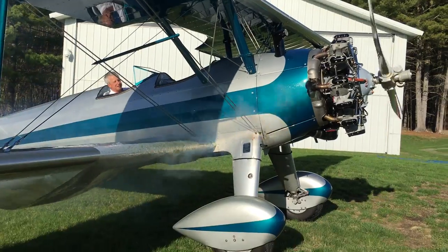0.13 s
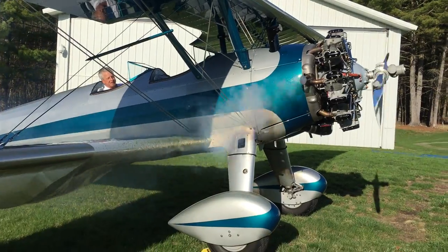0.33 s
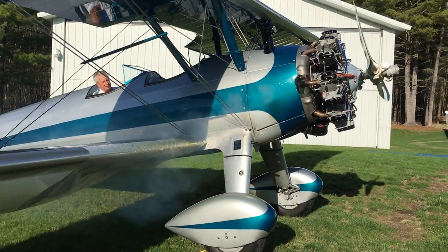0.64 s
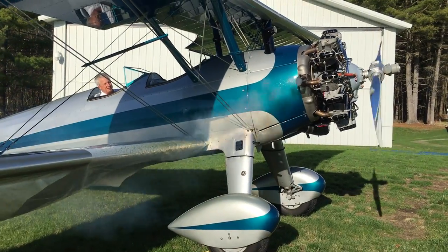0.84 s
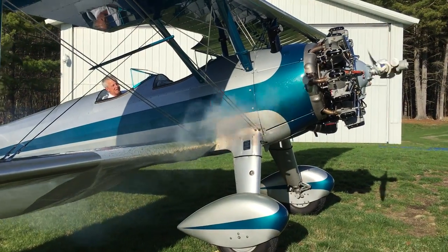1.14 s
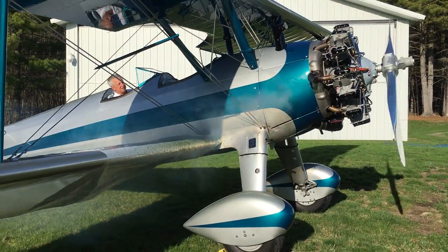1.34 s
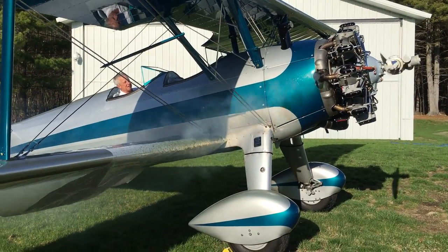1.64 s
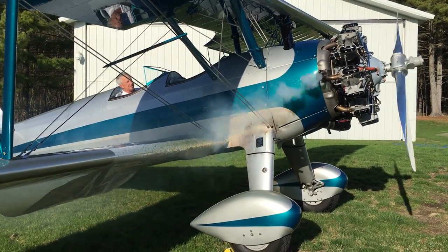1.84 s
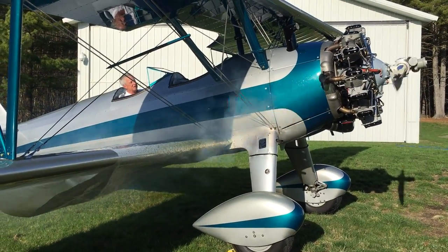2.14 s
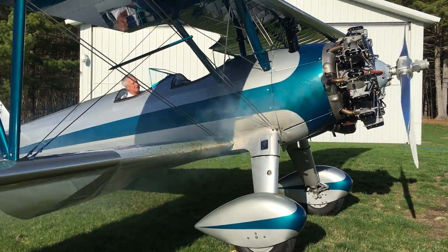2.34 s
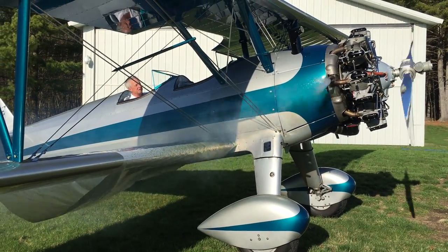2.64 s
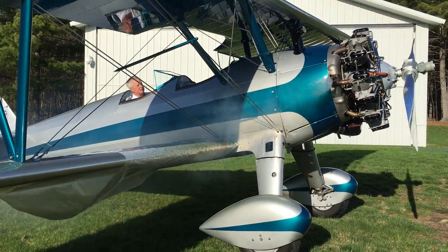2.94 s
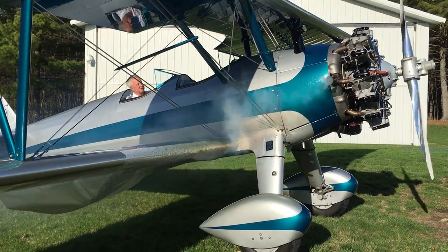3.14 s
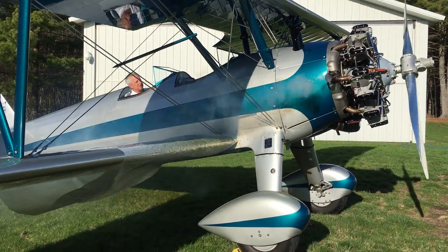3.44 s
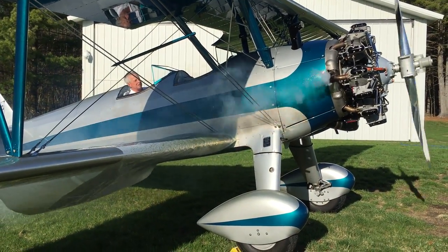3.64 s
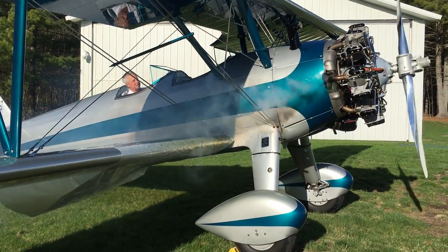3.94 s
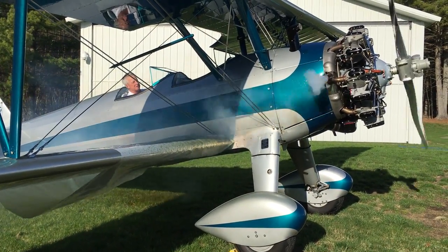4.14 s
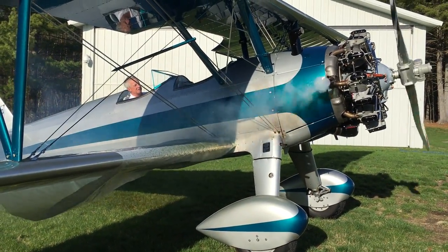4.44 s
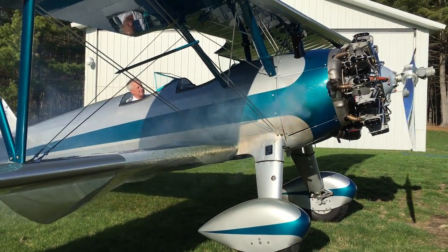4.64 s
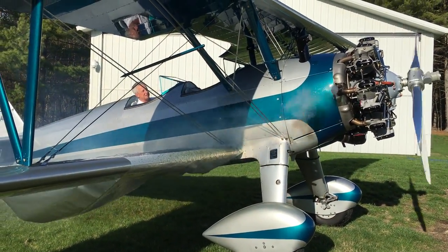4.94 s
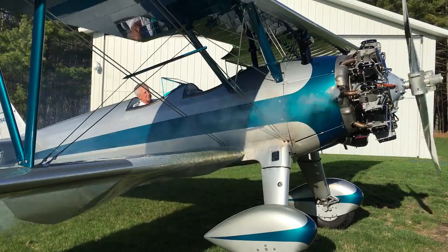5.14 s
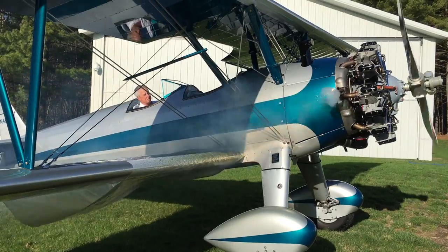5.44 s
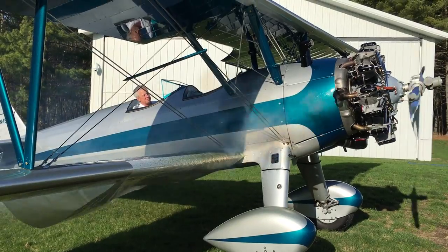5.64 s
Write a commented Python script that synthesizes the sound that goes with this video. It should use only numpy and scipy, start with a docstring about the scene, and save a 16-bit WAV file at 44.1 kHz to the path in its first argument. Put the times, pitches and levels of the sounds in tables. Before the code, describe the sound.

A freshly started seven-cylinder radial engine runs throughout at a rough slow idle. Separate exhaust strokes pop, hiss and bark in a fast lurching rhythm, some cracking hard, others missing and leaving gaps over a low throb. Gear churn, propeller wash and loose metal ticks continue beneath. Close outdoor microphone, mostly dry, with brief faint echoes from the wings, hangar and trees.

```python
"""A seven-cylinder radial aircraft engine, just started, lopes at about 490 rpm on the grass before a hangar.
Gears, propeller wash and loose metal churn and tick from the start. As each exhaust valve opens, a sharp jet
of gas rings the pipe, with a boom and a bark; hard firings crack, and rumble and a rising hum trail the stroke.
The cold cylinders often miss, and each miss slows the crank. Firing or not, each stroke pumps a deep throb.
Last come the echoes of the exhaust from the wings, the hangar and the trees."""
import sys
import numpy as np
from scipy import signal
from scipy.fft import rfft, irfft
from scipy.io import wavfile
from scipy.ndimage import uniform_filter1d

SR = 44100
rng = np.random.default_rng(int(sys.argv[2]) if len(sys.argv) > 2 else 0)


def transcribe(signal):
    """Save signal, clipped to [-1, 1], as a 16-bit WAV file at the path in sys.argv[1]."""
    frames = np.atleast_2d(signal).T
    limited = np.clip(frames, -1, 1)
    pcm = np.round(limited * 32767).astype(np.int16)
    wavfile.write(sys.argv[1], SR, pcm)


N = 254898

# Gears, valve gear and propeller wash. Each row: frequency in Hz, relative density in dB per Hz.
MACHINE_SPECTRUM = [(15, -13), (60, -11), (120, -16), (165, -12), (210, 14), (300, 12), (460, -1.5),
                    (620, -1), (1000, 0.5), (1900, 0.5), (2800, -4.5), (3900, -5), (7000, -17.5),
                    (16000, -23)]
# Crankshaft speed while all cylinders fire. Each row: time in seconds, speed in rpm.
CRANK_SPEED = [(0, 496.61), (2.608, 489.78), (2.656, 508.66), (4.083, 486.64), (4.645, 519.66),
               (5.78, 516.63)]
# A usual firing of each cylinder, in firing order. Each row: how early the valve opens in seconds,
# gas jet in dB, pipe ring in dB, boom in dB, boom pitch in Hz, length of the jet in seconds.
USUAL_FIRINGS = [(.0082, -24.5, -22, -60, 293, 0.02), (.0071, -29, -24.5, -34, 294, 0.02),
                 (.012, -19, -21, -26, 304, 0.016), (.0098, -18.5, -17.5, -34.5, 288, 0.012),
                 (.0091, -30, -25, -42.5, 259, .02), (.0092, -22.5, -22, -29, 288.4, 0.02),
                 (.0106, -19, -21.3, -27, 328.7, 0.016)]
# Bangs and half-burnt charges, against the cylinder's usual firing. Each row: time in seconds,
# change of gas jet, pipe ring and boom in dB, then the length of the jet itself in seconds.
ODD_FIRINGS = [(.02, 4, 1, 0, 0.021), (.2, 1.5, 0.5, -0.5, .018), (.27, -3, -1.5, -8, .022),
               (.41, -.5, 0.5, -10, .017), (.48, 3, -0.5, -2, 0.018), (.52, -8, -4, 1, 0.016),
               (.55, 1.5, 2, 1.5, 0.02), (.62, 2, -0.5, 12, 0.02), (.77, .5, 2, 2, 0.019),
               (.91, 3, 3, -12, 0.018), (.98, 5.5, 3, -4, 0.018), (1.12, 3, 1, -9, 0.017),
               (1.26, -2.5, -2.5, 0, 0.023), (1.4, 2.5, 4.5, -3, 0.018), (1.44, -.5, -2, -12, .015),
               (1.54, -1.5, -4.5, -4, 0.017), (1.83, -1.3, -0.5, 11.5, 0.012), (1.9, -2, -4, -21, .016),
               (2.01, 4, 1.5, 5.5, 0.02), (2.29, -2.5, 1, 5, 0.02), (2.33, -10, -6.5, 2, 0.01),
               (2.36, -.5, 1.5, 9, 0.024), (2.58, -12, -11.5, -19, 0.014), (2.75, -1, -2, 7, .026),
               (2.78, 0.3, 2, 1.5, 0.015), (2.92, -20, -12, -12, .013), (2.96, 2.5, 1.5, -3, .012),
               (3.06, 2.3, 1.5, 2, 0.011), (3.13, -0.5, -2, 0, 0.012), (3.24, 0, 2, -14, .015),
               (3.41, 1.5, 0, -6, 0.017), (3.59, -3, 0.5, 7, 0.022), (3.66, 2, 2.5, 1, .016),
               (3.73, 5, 1.5, -4, 0.016), (3.8, -1.5, 1.5, -2, 0.0098), (3.91, 1, -2.5, -1, 0.015),
               (3.98, -5, -14, 0, 0.0098), (4.08, -3, 0.5, 2, 0.015), (4.57, 2, -1.5, 5, 0.015),
               (4.6, -1, 0.5, -10, 0.019), (4.73, 2, -7.5, -0.5, 0.014), (4.8, -3, -2.5, -5, 0.019),
               (4.83, 1.5, -4, 0.5, .021), (4.86, -2, -3, -9, .015), (5.17, 4.5, 1.5, -7, 0.019),
               (5.41, -4, 0, 5, .0175), (5.43, -4, -2.5, -24, 0.017), (5.54, -4.5, -7, -20, .012),
               (5.57, -7.5, -3.5, -26, .012)]
# Strokes that fail to fire: a faint puff of gas and a boom, sometimes strong.
# Each row: time in seconds, boom in dB.
MISFIRES = [(.09, -50), (.3, -32), (.44, -50), (.59, -31), (.8, -31.5), (.83, -40), (.94, -53), (1.29, -38),
            (1.33, -50), (1.509, -39), (1.58, -31), (1.929, -50), (2.039, -29), (2.08, -50), (2.22, -48),
            (2.44, -43), (2.54, -38), (2.82, -37), (3.02, -43), (3.3, -49), (3.51, -30), (3.552, -57),
            (4.05, -48), (4.291, -57), (4.76, -41), (4.96, -45), (5, -44), (5.132, -48), (5.47, -29),
            (5.71, -48)]
# Exhaust character, in firing order. Each row: boom delay in seconds, bark in dB, pipe note favoured in Hz,
# boost of that note in dB, jet brightness in dB per octave.
CYLINDERS = [(-0.034, -2.5, 1490, 2.5, 0), (0.0097, -11, 1050, 1.5, 3.5), (0, -10.5, 2000, 9.5, 2),
             (.006, -13.5, 1500, 8.5, 6.5), (-0.012, -13, 1490, 2, 6), (0.001, -11, 2150, 3.5, 3.5),
             (-.003, -12, 1830, 7.5, 10)]
# Gas jet at the outlet. Each row: frequency in Hz, relative density in dB per Hz.
JET_SPECTRUM = [(300, -7.5), (900, -21.5), (2000, -1.5), (2900, -18.5), (3700, 1.5), (5000, -0.5),
                (6500, 2.5), (8000, 0.5), (9700, -0.5), (10400, -7), (11300, -3.5), (13000, -7.5),
                (16000, -13)]
# Higher notes of the exhaust pipe. Each row: pitch in Hz, width in Hz, level in dB.
PIPE_NOTES = [(711, 27, 0), (895, 42, 3), (986, 72, 3.5), (1169, 85, -1.5), (1280, 64, -2), (1497, 52, 9.5),
              (1843, 155, 3), (2150, 85, 6), (2400, 90, 1), (2777, 54, -4.5), (3330, 374, 0.5),
              (3735, 318, 4.5), (4204, 140, -1), (5340, 440, -2), (6620, 290, 0.5)]
# Each cylinder joins the collector ring at its own place and drives its two lowest air modes differently.
# Each row: deep mode in dB, its delay in seconds, upper mode in dB, its delay in seconds.
COLLECTOR_DRIVE = [(-18, -0.0103, -19, 0.0026), (-25.5, 0.0013, -35, -0.0146),
                   (-21.5, 0.0126, -22.5, -.0136), (-14.5, -0.0027, -22, 0.0108),
                   (-16, -0.0065, -30, 0.0104), (-31, 0.0027, -19.5, 0.01785), (-28, 0.0246, -20, 0.0057)]
# Eddies that follow each slug of gas out of the pipe. Each row: frequency in Hz, relative density in dB per Hz.
EDDY_SPECTRUM = [(15, -30), (26, -14), (33, 1), (50, -2.5), (70, -6), (95, 3), (115, 1), (140, -9),
                 (165, -23.5), (195, -7), (240, -19), (330, -16.5), (450, -35), (2000, -76)]
# How long the echoes last. Each row: frequency in Hz, time to fall by 60 dB in seconds.
YARD_DECAY = [(100, 0.21), (1000, 0.32), (4000, 0.13), (16000, 0.078)]

SAG_RPM, RECOVER_S = 11.68, .1392  # speed lost at a misfire; time constant of winning it back
PUFF_JET_DB, PUFF_RING_DB = -55, -41.5  # the faint gas jet and pipe ring of a misfire
OUTLET_ECHO_S, OUTLET_ECHO = .00164, .3  # the jet's reflection in the stub of the pipe: delay, gain
BARK_HZ, BARK_WIDTH_HZ = 597.4, 43.5  # the tail pipe's lowest strong note
BOOM_WIDTH_HZ = 44.4  # the collector's hollow boom at each stroke
DEEP_HZ, DEEP_WIDTH_HZ = 48.4, 22.7
UPPER_HZ, UPPER_WIDTH_HZ = 91.4, 36.2
USUAL_JET_DB = -22  # the jet level against which harder and softer strokes are weighed
EDGE_HZ = 16020


def gain_of(db):
    """Decibels to amplitude."""
    return 10 ** (np.asarray(db) / 20)


def evened(x):
    """Scales to an rms of 1."""
    return x / np.sqrt(np.mean(x ** 2) + 1e-20)


def read_curve(points, hz):
    """Reads a table of (Hz, value) on a log-frequency axis."""
    f, value = np.transpose(points)
    return np.interp(np.log(hz + 1), np.log(f + 1), value)


def add(mix, s, sound):
    """Mixes a sound in at a time in seconds."""
    part = mix[max(round(s * SR), 0):][:len(sound)]
    part += sound[:len(part)]


def delayed(x, s):
    """The same sound, later."""
    return np.interp(np.arange(N) - round(s * SR), np.arange(N), x, left=0)


def filtered(x, order, hz, kind):
    """A Butterworth filter, run forward."""
    return signal.sosfilt(signal.butter(order, hz, kind, fs=SR, output="sos"), x)


def noise(spectrum, size, tilt_db=0):
    """Noise of rms 1 with a given spectrum, tilted by some dB an octave."""
    hz = np.fft.rfftfreq(size, 1 / SR)
    colour = gain_of(read_curve(spectrum, hz) + tilt_db * np.log2(hz + 1))
    return evened(irfft(rfft(rng.standard_normal(size)) * colour, size))


def resonate(x, hz, width_hz):
    """A resonance with a gain of 1 at its centre."""
    return signal.lfilter(*signal.iirpeak(hz, hz / width_hz, fs=SR), x)


def ring(x, modes):
    """Passes a sound through a set of resonances side by side."""
    return sum(gain_of(db) * resonate(x, hz, width_hz) for hz, width_hz, db in modes)


def note(hz, width_hz, glide=0):
    """An air resonance that swells and dies; hot gas may bend its pitch as it sounds."""
    t = np.arange(8192) / SR
    age = np.pi * width_hz * t
    turns = np.cumsum(hz * (1 + glide * np.tanh(age - 2))) / SR
    return age * np.exp(1 - age) * np.sin(2 * np.pi * turns)


def blowdown(t, length_s, rise_s, fall_s):
    """Gas flow: it swells as the valve lifts, holds while the port is choked, then dies as the cylinder empties."""
    swell = 1 - np.exp(-t / rise_s)
    return swell / np.sqrt(1 + np.exp(2 * (t - length_s) / fall_s))


def valve_times():
    """One exhaust valve after another opens, all in two turns of the crank; each misfire costs the crank speed."""
    step_s, count = .001, len(USUAL_FIRINGS)
    t = np.arange(0, N / SR + .1, step_s)
    rpm = np.interp(t, *np.transpose(CRANK_SPEED))
    for s, _ in MISFIRES:
        rpm -= SAG_RPM * (t > s) * np.exp(-abs(t - s) / RECOVER_S)
    opened = np.cumsum(rpm / 60) * step_s * count / 2  # running count of strokes
    times = np.array([np.interp(k, opened, t) - USUAL_FIRINGS[k % count][0] for k in range(int(opened[-1]))])
    return times[times < N / SR]


def firings():
    """Every exhaust stroke as (s, gas jet dB, pipe ring dB, boom dB, boom pitch Hz, length of the jet s)."""
    times = valve_times()
    rows = np.array([(s, *USUAL_FIRINGS[k % len(USUAL_FIRINGS)][1:]) for k, s in enumerate(times)])
    for s, jet_db, ring_db, boom_db, length_s in ODD_FIRINGS:
        row = rows[abs(times - s).argmin()]  # the stroke nearest in time
        row[1:4] += jet_db, ring_db, boom_db
        row[-1] = length_s
    for s, boom_db in MISFIRES:
        rows[abs(times - s).argmin(), 1:4] = PUFF_JET_DB, PUFF_RING_DB, boom_db
    return rows


def strokes(cylinders):
    """Pairs each exhaust stroke with its cylinder's row of a table."""
    return [(row, cylinders[k % len(cylinders)]) for k, row in enumerate(firings())]


def machinery(level_db=-33.5, tap_db=-35, tap_decay_s=0.0018, scatter_s=0.0018, uneven_db=3):
    """Steady churn of gears and propeller, with the rockers tapping between the firings."""
    t, taps = np.arange(2048) / SR, np.zeros(N)
    for s, *_ in firings():
        for delay_s, own_db in ((.016, -7), (.027, -8)):  # one valve shuts, then another
            late, force = rng.standard_normal(2)
            tap = np.exp(-t / tap_decay_s) * noise(JET_SPECTRUM, len(t), tilt_db=-3.5)
            add(taps, s + delay_s + scatter_s * late, gain_of(tap_db + own_db + uneven_db * force) * tap)
    return gain_of(level_db) * noise(MACHINE_SPECTRUM, N) + taps


def rattle(level_db=-43, per_s=140, uneven_db=4, decay_s=.003, tilt_db=1, low_hz=650):
    """Loose sheet metal and linkages, shaken by the engine, tick at random."""
    t, out = np.arange(1024) / SR, np.zeros(N)
    parts = 12  # loose parts, each with a tick of its own
    for _ in range(parts):
        hits = rng.random(N) < per_s / parts / SR
        force_db = uneven_db * np.minimum(rng.exponential(1, N), 3)
        tick = np.exp(-t / decay_s) * noise(MACHINE_SPECTRUM, len(t), tilt_db)
        out += signal.oaconvolve(hits * gain_of(force_db), tick)[:N]
    return gain_of(level_db) * evened(filtered(out, 4, low_hz, "highpass"))


def jets(level_db=1, dull_db=-7, rise_s=0.0012, fall_s=0.0026, hold=0.71, dull_rise_s=0.0023, dull_hold=1.33,
         dull_fall_s=0.0052, dull_tilt_db=-4, flutter_db=2, harder=0.052):
    """Turbulent hiss of each blowdown: bright while the pressure is high, duller as it falls."""
    t, out = np.arange(4096) / SR, np.zeros(N)
    for (s, jet_db, *_, length_s), (*_, own_db) in strokes(CYLINDERS):
        tilt_db = own_db + harder * (jet_db - USUAL_JET_DB)  # a harder firing makes a brighter jet
        flutter = evened(uniform_filter1d(rng.standard_normal(len(t)), size=70))
        bright = blowdown(t, hold * length_s, rise_s, fall_s) * noise(JET_SPECTRUM, len(t), tilt_db)
        dull_flow = blowdown(t, dull_hold * length_s, dull_rise_s, dull_fall_s)
        dull = dull_flow * noise(JET_SPECTRUM, len(t), tilt_db + dull_tilt_db)
        add(out, s, gain_of(jet_db + flutter_db * flutter) * (bright + gain_of(dull_db) * dull))
    return gain_of(level_db) * (out + OUTLET_ECHO * delayed(out, OUTLET_ECHO_S))


def pipe(level_db=8.5, rise_s=0.0044, fall_s=0.0084, hold=0.91, favour_hz=150, uneven_db=3.0, heat=0.0093,
         low_hz=600):
    """The rushing gas rings the pipe's higher notes; their balance and pitch shift from stroke to stroke."""
    t, out = np.arange(4096) / SR, np.zeros(N)
    hz, width_hz, db = np.transpose(PIPE_NOTES)
    for (s, _, ring_db, *_, length_s), (_, _, own_hz, favour_db, _) in strokes(CYLINDERS):
        flow = blowdown(t, hold * length_s, rise_s, fall_s)
        rush = gain_of(ring_db) * flow * rng.standard_normal(len(t))
        favour = favour_db * np.exp(-((hz - own_hz) / favour_hz) ** 2)
        own_db = db + favour + uneven_db * rng.standard_normal(len(hz))
        warm_hz = hz * (1 + heat * rng.standard_normal())  # all notes shift together
        add(out, s, ring(rush, zip(warm_hz, width_hz, own_db)))
    return gain_of(level_db) * filtered(out, 2, [low_hz, 7000], "bandpass")


def booms(boom_db=6.0, bark_db=0, bend=0.051, heat=0.025, boom_heat=0.037, uneven_db=2):
    """Around each stroke the collector booms, just before or after the jet, and the pipe gives a higher bark."""
    out = np.zeros(N)
    for (s, _, ring_db, stroke_db, boom_hz, _), (delay_s, own_bark_db, *_) in strokes(CYLINDERS):
        glide, warmth, force = rng.standard_normal(3)
        boom = note(boom_hz * (1 + boom_heat * warmth), BOOM_WIDTH_HZ, bend * glide)
        bark = note(BARK_HZ * (1 + heat * warmth), BARK_WIDTH_HZ)
        add(out, s + delay_s, gain_of(stroke_db + boom_db + uneven_db * force) * boom)
        add(out, s, gain_of(ring_db + own_bark_db + bark_db) * bark)
    return out


def throb(level_db=0, follow=0.16, low_hz=26.5):
    """Each stroke pumps the collector's air column, harder when the cylinder has fired."""
    out = np.zeros(N)
    for (s, jet_db, *_), (deep_db, deep_delay_s, upper_db, upper_delay_s) in strokes(COLLECTOR_DRIVE):
        force_db = level_db + follow * (jet_db - USUAL_JET_DB)
        add(out, s + deep_delay_s, gain_of(force_db + deep_db) * note(DEEP_HZ, DEEP_WIDTH_HZ))
        add(out, s + upper_delay_s, gain_of(force_db + upper_db) * note(UPPER_HZ, UPPER_WIDTH_HZ))
    return signal.sosfiltfilt(signal.butter(3, low_hz, "highpass", fs=SR, output="sos"), out)


def cracks(level_db=-18, hard_jet_db=-18, growth=1.4, when=0.51, spread_s=0.0036, tilt_db=1, rasp_db=1,
           rasp_width_hz=900):
    """At the height of a hard firing the jet forms shocks: a brief crack, its rasp pitched anew each stroke."""
    t, out = np.arange(2048) / SR, np.zeros(N)
    for s, jet_db, *_, length_s in firings():
        hiss = noise(JET_SPECTRUM, len(t), tilt_db)
        rasp = resonate(hiss, rng.uniform(3860, 9500), rasp_width_hz)
        swell = np.exp(-((t - when * length_s) / spread_s) ** 2 / 2)
        crack_db = level_db + growth * (jet_db - hard_jet_db)  # soft strokes hardly crack
        add(out, s, gain_of(crack_db) * swell * (hiss + gain_of(rasp_db) * rasp))
    return out


def eddies(level_db=-26.0, delay_s=0.01186, length_s=.045, follow=0.18):
    """A soft, irregular puff of rumble trails every slug of gas."""
    out, swell = np.zeros(N), signal.windows.hann(round(length_s * SR))
    for s, jet_db, *_ in firings():
        puff = evened(noise(EDDY_SPECTRUM, size=8192)[:len(swell)]) * swell
        add(out, s + delay_s, gain_of(follow * (jet_db - USUAL_JET_DB)) * puff)
    return gain_of(level_db) * evened(filtered(out, 4, 27, "highpass"))


def hums(level_db=-25, hum_hz=195, width_hz=42, delay_s=0.01733, glide=0.065, follow=0.3):
    """A rising hum of the tail pipe trails each stroke, favouring the cylinder that barks most."""
    out = np.zeros(N)
    for (s, jet_db, *_), (_, bark_db, *_) in strokes(CYLINDERS):
        hum_db = bark_db + follow * (jet_db - USUAL_JET_DB)
        add(out, s + delay_s, gain_of(hum_db) * note(hum_hz, width_hz, glide))
    return gain_of(level_db) * out


def yard(x, first_s=.012, per_s=2000):
    """Scattered echoes from the wings, the hangar and the trees, fading at a rate set by pitch."""
    size = SR // 2
    chosen = rng.standard_normal(size) * (rng.random(size) < per_s / SR)
    echoes = chosen * (np.arange(size) > first_s * SR)
    hz, t, z = signal.stft(echoes, SR, nperseg=256)
    z = z * gain_of(-60 * t / read_curve(YARD_DECAY, hz)[:, None])
    tail = signal.istft(z, SR, nperseg=256)[1]
    return signal.fftconvolve(x, tail / np.linalg.norm(tail))[:N]


def scene(wet_db=-17):
    """The exhaust with its echoes, over the throb and the machinery."""
    exhaust = jets() + cracks() + pipe() + booms() + hums()
    echoes = gain_of(wet_db) * yard(exhaust)
    return (exhaust + echoes + throb() + eddies() + machinery() + rattle())[None]


def record(dry):
    """The recorder rounds off the very highest peaks; then its band limit ends the treble."""
    rounded = dry / (1 + (dry / .85) ** 6) ** (1 / 6)
    band_limit = signal.firwin(511, EDGE_HZ, window=("kaiser", 9), fs=SR)
    return signal.oaconvolve(rounded, band_limit[None], "same")


dry = scene()
out = record(dry)
transcribe(out)
```